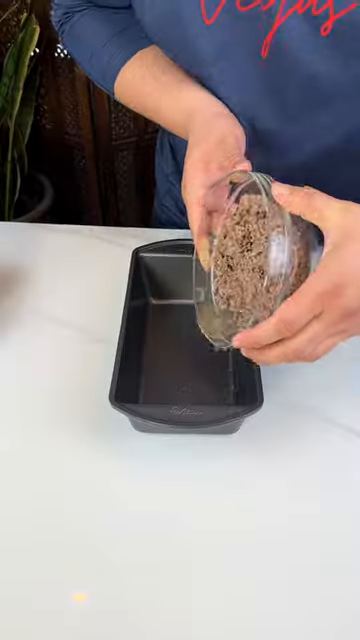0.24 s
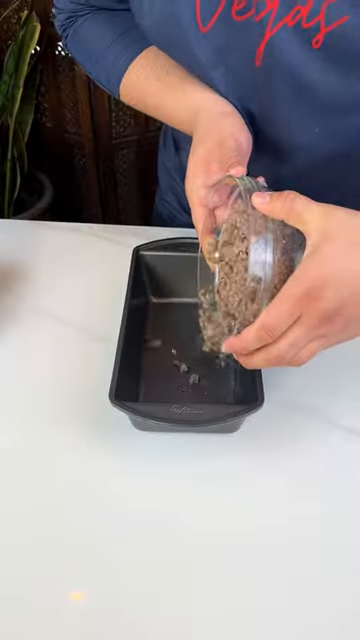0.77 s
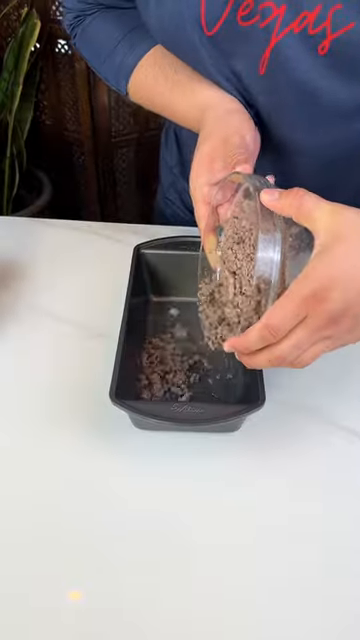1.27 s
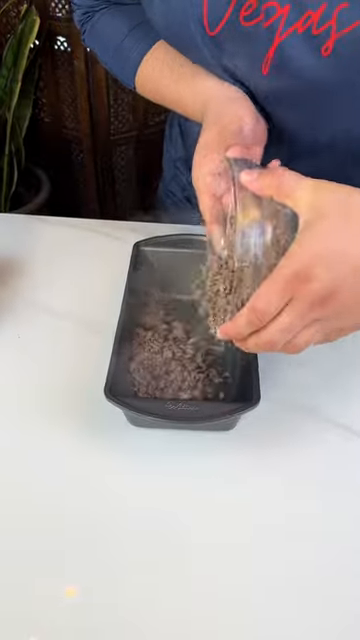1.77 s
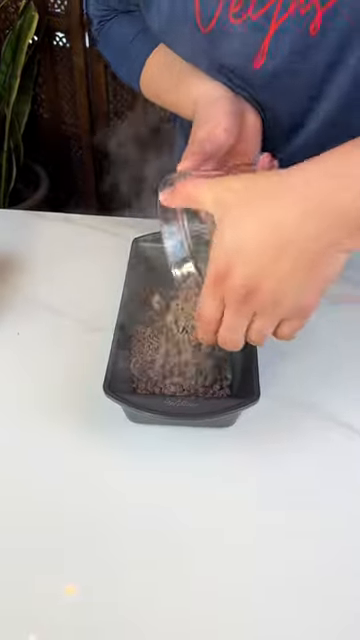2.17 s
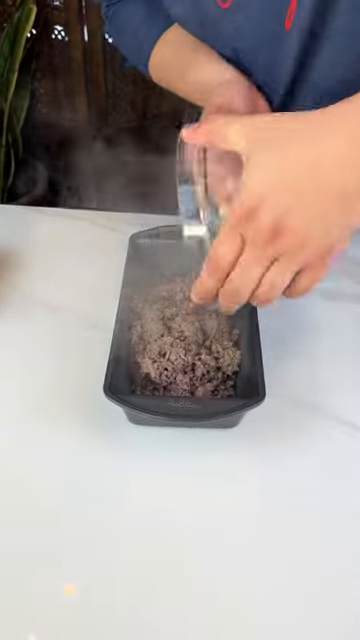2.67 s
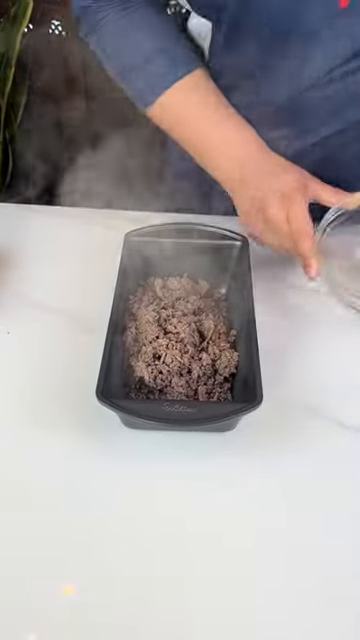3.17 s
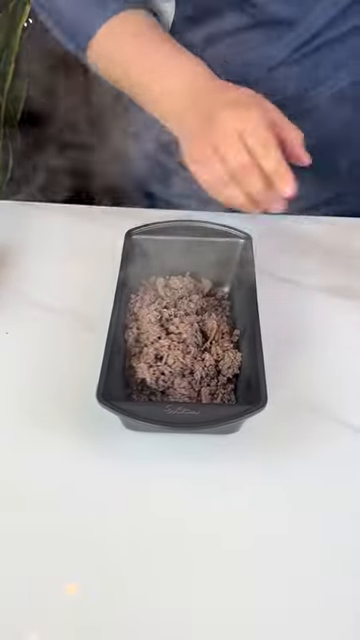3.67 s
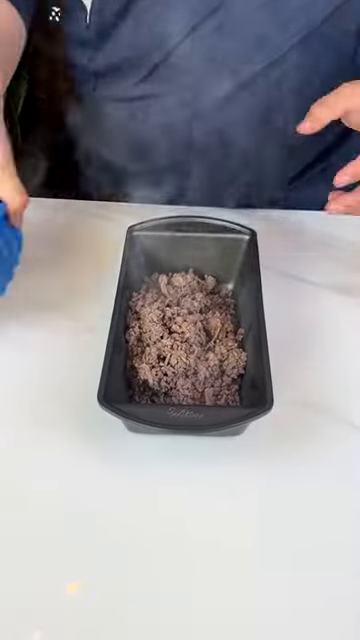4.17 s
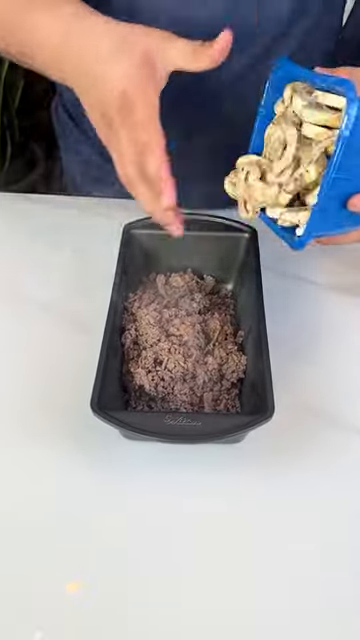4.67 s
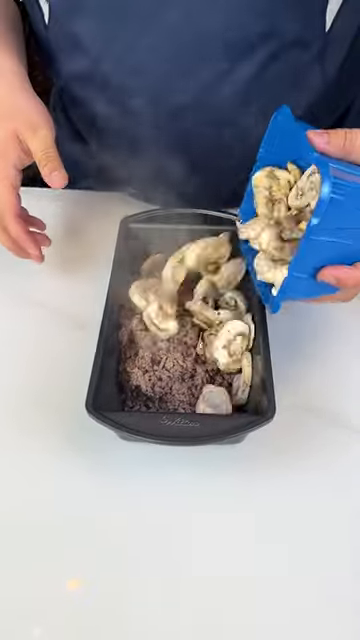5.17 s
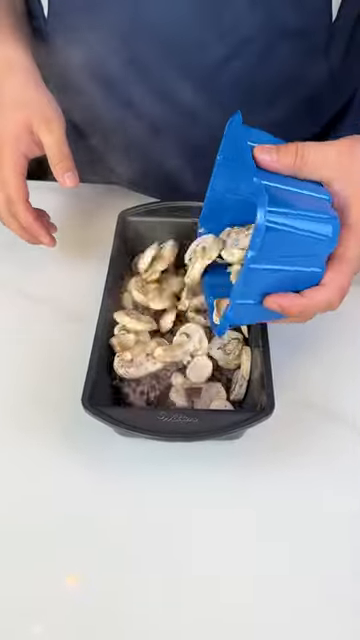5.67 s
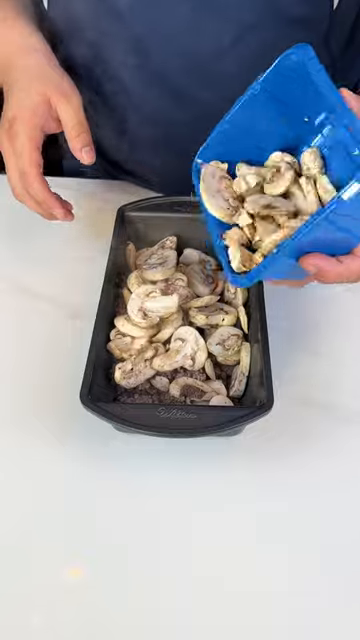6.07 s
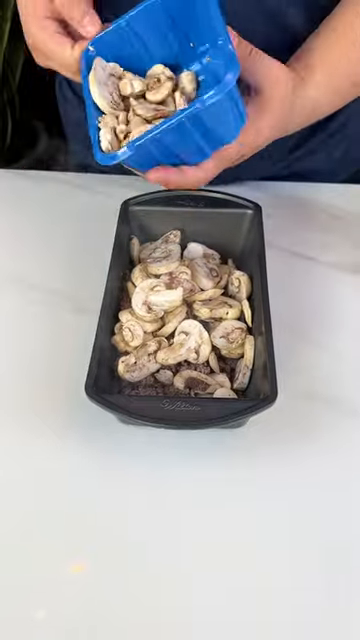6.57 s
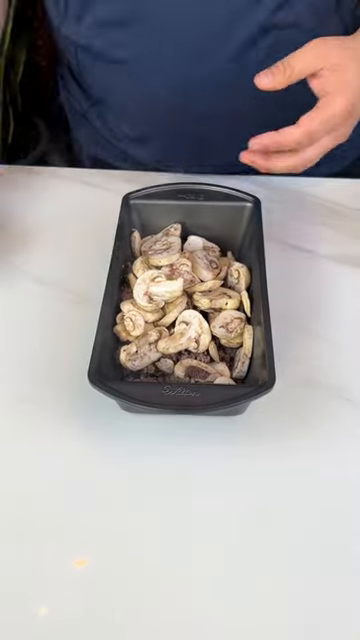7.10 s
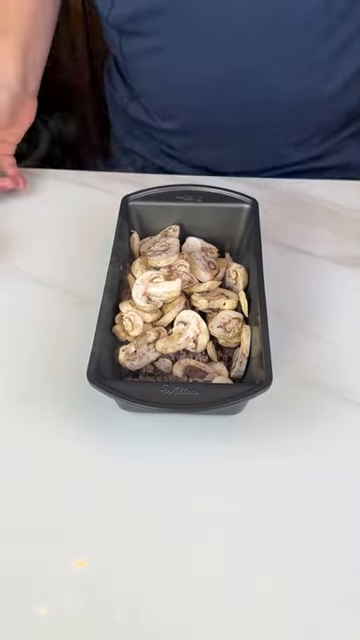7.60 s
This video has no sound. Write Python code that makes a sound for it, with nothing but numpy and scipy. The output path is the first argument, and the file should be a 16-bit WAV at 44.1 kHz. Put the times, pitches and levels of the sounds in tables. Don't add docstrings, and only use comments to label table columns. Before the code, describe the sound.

A loud metallic pan blow with a short bright ring and smaller rebound, then soft crumbly mince thuds. Next come two very hard bowl knocks, edge then flat, light handling scrapes, and a dense patter of wet dull slices against metal. The tub knocks and rattles in the hand before landing with a plasticky clack. Near microphone, short hard-room echo, low ventilation hum throughout.

```python
import sys
import numpy as np
from scipy import signal
from scipy.fft import rfft, irfft, next_fast_len
from scipy.io import wavfile
from scipy.ndimage import uniform_filter1d, minimum_filter1d

SR = 44100
rng = np.random.default_rng(int(sys.argv[2]) if len(sys.argv) > 2 else 0)


def output_pcm(signal):
    pcm = np.clip(np.atleast_2d(signal).T, -1, 1) * 32767
    wavfile.write(sys.argv[1], SR, np.round(pcm).astype(np.int16))


def convert_level_to_amplitude(level_db):
    exponent = np.asarray(level_db, float) / 20
    return 10 ** exponent


N = 345826

# (start [s], end [s])
CUT = (.191, 0.2035)
# (frequency [Hz], density [dB per Hz])
AIR = [(12, -61), (20, -27.5), (86, 1), (244, -20), (273, -23), (314, -17.5), (506, -28.5), (551, -24.5),
       (1950, -31), (5070, -46.5), (6000, -42.5), (10500, -71.5), (15200, -59), (16500, -64)]
# (frequency [Hz], density [dB per Hz])
FIRST_AIR = [(12, -71), (20, -14), (224, -7.5), (351, -17.5), (551, -15), (1080, -18.5), (2240, -23.5),
             (10500, -47), (16500, -46.5)]
# (time [s], pitch [Hz], level [dB])
DRONE = [
    (2.3, 142.2, -80),
    (2.501, 164.1, -45.5),
    (2.799, 178.2, -55.5),
    (3.2, 194, -57),
    (3.502, 192, -74),
]

# (frequency [Hz], t60 [s])
ROOM = [(150, 0.25), (500, 0.24), (1500, 0.21), (4000, 0.21), (9000, 0.2)]
# (frequency [Hz], port difference minus sum [dB])
DIFFUSE_SIDE = [(60, -47.5), (180, -18.5), (310, -9.5), (550, -2), (950, -4.5), (1650, -8.5), (2860, 4),
                (4970, 7), (8640, -29), (15000, 11.5)]
# (frequency [Hz], port difference minus sum [dB])
DIRECT_SIDE = [(60, -43.5), (180, -28), (310, -21), (550, -12.5), (950, -9), (1650, -12.5), (2860, 2.5),
               (4970, -3), (8640, 2.5), (15000, 8.5)]
# (frequency [Hz], gain [dB])
NOTCH = [(9000, 1.5), (9800, -0.5), (10500, -3), (11500, -7.5), (13500, -11), (14600, 3.5), (15400, 0),
         (15900, 1.5), (16200, -34.5)]

# (frequency [Hz], density [dB per Hz])
BODY = [(71, -39.5), (120, 6.5), (178, -1.5), (577, -3.5), (1050, -4), (1560, -20.5), (4000, -31),
        (5200, -33), (8800, -120)]
# (frequency [Hz], density [dB per Hz])
DRAG = [(120, -29.5), (200, -5), (506, 1), (958, 6.5), (1140, 4), (2190, -18), (4000, -17), (5200, -51),
        (8800, -120)]
# (frequency [Hz], density [dB per Hz])
KNOCK = [(900, -45), (1400, 6.5), (1900, 4), (2600, 0.5), (3200, -9), (4200, -44.5)]
# (frequency [Hz], density [dB per Hz])
HISS = [(880, -16.5), (1500, -7), (1940, -3), (3150, -6.5), (4970, -6.5), (6890, -7.5), (9750, -18),
        (12700, -25.5), (16000, -24.5)]
# (frequency [Hz], density [dB per Hz])
FIZZ = [(1060, -14.5), (1800, 1), (2790, -4), (3060, 3.5), (3610, -12), (6180, -7.5), (9950, -22),
        (11200, -40), (15000, -25.5), (16000, -30.5)]

# (time [s], level [dB])
HANDS = [(.24, -59.5), (.72, -56.5), (1.25, -63), (1.55, -58.5), (2.08, -57.5), (2.3, -60), (2.7, -65),
         (3.21, -57.5), (3.85, -68.5), (4.85, -59), (5.05, -55.5), (5.4, -66.5), (5.75, -67), (5.9, -95),
         (6.55, -62.5), (6.72, -70), (6.8, -60), (7.55, -99)]
# (peak time [s], rise [s], fall [s], body [dB], hiss [dB])
SCRAPES = [(3.989, 0.024, 0.11, -54, -60), (4.47, 0.026, 0.086, -55, -61.5),
           (4.583, 0.052, 0.047, -46, -53.5), (5.532, 0.011, 0.017, -45, -64),
           (6.437, 0.01, 0.01, -59, -55.5), (6.609, 0.015, 0.022, -46, -41.5),
           (7.029, 0.11, 0.055, -43, -71), (7.19, 0.024, 0.11, -34.5, -62), (1.15, 0.022, 0.045, -54, -73),
           (2.04, 0.055, 0.084, -60, -61.5), (6.27, .04, .04, -73.5, -66.5), (5.78, .01, .03, -54, -67)]
# (time [s], level [dB])
MINCE_FLOW = [
    (1.52, -38),
    (1.56, -38),
    (1.9, -57.5),
    (2.08, -61),
    (2.33, -59),
    (2.404, -39.5),
    (2.6, -66),
]
# (time [s], level [dB])
SLICE_FLOW = [
    (4.7, -65),
    (4.85, -41),
    (5.0, -36.5),
    (5.28, -41),
    (5.74, -44),
    (5.78, -39),
    (6.12, -58.5),
    (6.249, -41),
]
# (time [s], peak [dB], pitch [Hz])
TICKS = [(0.528, -40.5, 8500), (0.593, -42.5, 5260), (1.6741, -52, 6310), (1.9629, -46, 4010),
         (1.995, -32.5, 3900), (2.039, -43, 4800), (2.0575, -32, 3530), (2.0965, -40, 3920),
         (2.161, -39.5, 7720), (4.807, -37.5, 5680), (5.041, -28, 4150), (5.5048, -35.5, 3730),
         (6.4326, -45, 4130), (7.034, -34, 5600)]
# (time [s], peak [dB], pitch [Hz], t60 [s])
SQUEAKS = [
    (1.834, -42.5, 5700, 0.083),
    (1.837, -46.5, 7460, 0.091),
    (2.6, -62, 2950, 0.11),
    (0.99, -47.5, 5280, 0.053),
    (3.23, -23, 816, 0.051),
    (3.23, -22, 2240, 0.11),
    (3.443, -25.5, 885, 0.14),
]
# (time [s], peak [dB], pitch [Hz], t60 [s])
LIFT = [
    (7.177, -31, 930, .1),
]

# (time [s], peak [dB], pitch [Hz], t60 [s])
PLOPS = [(4.807, -41, 1000, 0.026), (4.82, -45, 1550, 0.054), (4.836, -36.5, 1760, 0.034),
         (4.836, -43, 1100, .04), (4.882, -50, 1180, 0.037), (4.906, -46, 1540, 0.033),
         (4.936, -34, 860, 0.07), (4.936, -42, 2410, 0.022), (4.947, -42, 2430, 0.07),
         (4.951, -33, 1700, 0.055), (4.974, -36, 1050, 0.05), (4.991, -34.5, 1956, 0.041),
         (4.991, -31.5, 1039, 0.13), (5.02, -33.5, 395, 0.089), (5.042, -34, 2230, 0.04),
         (5.052, -29.5, 296, 0.032), (5.065, -24.5, 434, 0.036), (5.135, -45, 1710, 0.05),
         (5.147, -59, 1030, 0.18), (5.172, -41, 633, 0.16), (5.222, -35.5, 1127, .05),
         (5.256, -34.5, 569, 0.095), (5.42, -44, 990, .04), (5.423, -50, 2400, 0.044),
         (5.437, -55, 1100, 0.031), (5.53, -43, 1050, 0.093), (5.661, -40.5, 410, 0.089),
         (5.766, -44, 2520, 0.063), (5.77, -31.5, 582, 0.16), (5.792, -43, 992, .12),
         (5.859, -27.5, 324, 0.038), (5.858, -32, 870, 0.032), (5.908, -42, 1100, 0.037),
         (5.936, -37, 980, 0.074), (6.017, -46, 900, 0.029), (6.076, -52, 1844, 0.059),
         (6.842, -25, 1029, 0.027), (6.884, -46, 1043, 0.089), (6.923, -37, 1030, 0.033),
         (6.953, -36.5, 497, 0.17), (6.974, -36.5, 2270, 0.027), (6.992, -34, 1400, .03),
         (7.021, -32.5, 2140, 0.034), (7.021, -44, 950, 0.053), (7.043, -35, 950, 0.18),
         (7.042, -33, 1290, 0.052), (7.109, -21.5, 330, 0.018), (7.1, -27, 374, 0.073),
         (7.007, -35, 2000, 0.027), (5.643, -39, 1120, 0.026)]
# (time [s], peak [dB], pitch [Hz], t60 [s])
HUMS = [
    (1.545, -45, 1435, 0.18),
    (1.548, -46, 2340, 0.14),
    (1.56, -42, 715, 0.29),
    (1.575, -41, 880, 0.22),
    (1.6, -46.5, 560, 0.42),
    (1.61, -50, 1077, 0.25),
    (1.63, -55, 1700, 0.23),
    (2.391, -48.5, 1042, 0.2),
]
# (time [s],
# peak [dB], pitch [Hz], t60 [s])
CLICKS_AND_NOTES = [(6.846, -27, 398, .06), (6.842, -34, 2500, .02), (10, -42, 7100, .02), (7.032, -37, 3800, 0.014),
                    (8.1, -37.5, 5700, .015), (7.7, -41.5, 1300, 0.016), (7.097, -42, 4200, .012),
                    (7.097, -34, 2600, .02), (10, -43, 2100, 0.022), (5.24, -29, 612, 0.053), (5.041, -34, 1400, .03),
                    (5.5, -45, 2300, .02), (5.186, -42.5, 1700, 0.036), (3.5, -47, 1200, .04), (4.935, -42, 1700, .02),
                    (5.055, -42, 2400, .02), (6.7, -42, 1150, .04), (6.4, -45, 1300, 0.018), (5.858, -49, 1980, .02),
                    (6, -38, 950, .04), (5.812, -36, 1000, .05), (5.332, -38.5, 1200, .03), (5.1, -37, 670, .04),
                    (5.2, -44, 530, .04), (5.67, -41, 820, .04), (5.83, -37, 480, 0.037), (5.075, -33, 250, 0.057),
                    (5.052, -34, 1200, .05), (4.8, -41, 1350, 0.019)]
# (time [s], level [dB], t60 [s])
PINGS = [
    (.742, -33, .55),
    (.866, -43, .5),
    (1.55, -61, .4),
    (4.991, -52, .22),
    (5.128, -55, .2),
    (5.767, -48, .06),
    (5.85, -65, .25),
]

# (time [s], peak [dB], pitch [Hz], knock [dB])
MINCE = [
    (1.372, -38.5, 880, -58),
    (1.542, -49, 600, -40.5),
    (1.599, -51, 666, -41),
    (1.791, -39.5, 880, -48),
    (2.264, -34.5, 590, -69),
    (2.372, -35, 680, -47.5),
]
# (time [s], peak [dB], pitch [Hz], knock [dB])
SLICES = [(4.821, -25, 534, -65), (4.834, -38, 1540, -64), (4.947, -23.5, 830, -34.5),
          (4.991, -35, 1110, -41), (5.044, -21, 1030, -44.5), (5.058, -22.5, 355, -71),
          (5.074, -27.5, 657, -71), (5.24, -34, 600, -60), (5.419, -41, 560, -49), (5.438, -37, 355, -49.5),
          (5.512, -35, 1110, -46.5), (5.642, -42, 724, -61), (5.698, -34, 342, -55),
          (5.767, -26.5, 506, -51), (5.779, -34, 590, -50), (5.857, -34, 624, -59),
          (5.906, -37, 906, -80.5), (5.961, -26, 870, -68), (6.015, -31.5, 290, -65),
          (6.074, -30.5, 1160, -48), (6.338, -38.5, 1030, -78)]
# (time [s], peak [dB], pitch [Hz], knock [dB])
TUB_KNOCKS = [
    (3.976, -58, 727, -49.5),
    (4.461, -48, 1050, -45.5),
    (4.535, -35.5, 1180, -48),
    (4.565, -41, 980, -37),
    (6.841, -22.5, 724, -38),
    (6.925, -29.5, 460, -60),
    (7.034, -31, 925, -55),
    (7.096, -25, 336, -37),
    (7.169, -52, 900, -39),
]
# (time [s], peak [dB], pitch [Hz], knock [dB])
RATTLE = [
    (6.975, -40.5, 687, -45),
    (6.994, -34, 800, -48),
    (7.006, -23, 906, -52.5),
    (7.024, -27, 550, -39),
]
# (tick of a middling knock [dB], first pan ring [dB], ring lost as the pan fills [dB per s], attack [s])
MATERIALS = [
    (-47.5, -7, 10, 0.0048),
    (-53.5, -13.5, 20.5, 0.00053),
    (-41, -27.5, 4, 0.0029),
    (-53.5, -29, -2, 0.003),
]
# (frequency [Hz], level [dB], t60 [s])
PAN = [(560, -1.5, 0.47), (900, 13.5, 0.045), (1082, 3, 0.16), (2240, -32.5, 0.17), (2350, -27, 0.11),
       (1700, -20, 0.1)]

# (time [s], peak [dB])
PAN_BLOW = [
    (0.7355, -27),
    (0.7381, -4),
    (.741, 1.5),
    (.746, -0.5),
    (.752, 0.5),
    (0.765, -16),
    (0.769, -12.5),
]
# (time [s], peak [dB])
PAN_REBOUND = [
    (0.8634, -16.5),
    (0.8649, -4),
    (0.87, -14.5),
    (.882, -30),
]
# (time [s], peak [dB])
BOWL_EDGE = [
    (3.234, -27),
    (3.2399, 4.5),
    (3.243, 1.5),
    (3.251, -5),
    (3.261, -14),
    (3.274, -13.5),
]
# (time [s], peak [dB])
BOWL_FLAT = [
    (3.454, -0.5),
    (3.457, 7.5),
    (3.462, 0),
    (3.471, -6),
    (3.48, -8),
]
# (time [s], peak [dB])
TUB_DOWN = [
    (7.2065, -6.5),
    (7.211, -5.5),
    (7.218, -7.5),
    (7.228, -23.5),
    (7.243, -12.5),
]
# (frequency [Hz], density [dB per Hz])
COLOURS = [
    [(71, -56.5), (130, -9), (300, -14.5), (445, -8.5), (727, -4.5), (1250, -10), (2480, -10),
     (9590, -32.5), (12000, -102), (16000, -66.5)],
    [(120, -58), (200, -26.5), (360, -1), (509, -18), (600, -17), (1500, -18.5), (2560, -16), (9230, -38.5),
     (11500, -62), (16000, -47)],
    [(80, -69), (190, -10), (450, -8.5), (850, -0.5), (1300, 1), (2400, -7), (3000, -14.5), (4300, -20.5),
     (9500, -38), (12500, -56), (14500, -66), (16000, -76)],
    [(100, -38.5), (200, -36.5), (400, -12), (800, -6), (1400, -10.5), (2100, -6.5), (2900, -18),
     (4200, -24.5), (9700, -37.5), (11000, -68), (14500, -50), (16000, -65)],
    [(220, -39), (320, -20), (700, -6), (2300, -4.5), (3600, -17), (9400, -38.5), (10200, -74.5),
     (16000, -79.5)],
]
# (frequency [Hz], level [dB], free t60 [s])
RINGS = [
    [(369, -11.5, 0.14), (1250, -13, 0.15), (1989, -9, 0.04), (3180, -10, .05), (3820, -24, 0.041),
     (647, -4, .07), (727, -6.5, 0.23), (1080, -16.5, 0.25), (1795, -3, .05), (2530, 0.5, 0.097),
     (2700, -4, 0.043), (5260, -12.5, 0.045), (2390, -11.5, .07), (835, -9.5, 0.089)],
    [(359.6, -3, 0.12), (560, -5, 0.17), (844, -4, 0.11), (1150, -6.5, 0.13), (2090, -14.5, 0.17),
     (2340, -5.5, 0.081), (2528, 0, 0.1), (3180, -14, .07), (4090, -20, .1), (5280, -10, .03),
     (4840, -27, 0.081), (6300, -31.5, 0.52)],
    [(355, -11.5, 0.089), (540, -18, 0.071), (838, 0, 0.065), (893, 0, 0.049), (1110, -10.5, 0.084),
     (1290, -11, 0.24), (1400, -4, 0.073), (1570, -10, 0.0577), (1780, -1.5, 0.071), (2234, -7, 0.058),
     (2400, -1.5, 0.11), (2920, -15.5, .08), (4130, -24.5, .07), (723.5, -5.5, .1)],
    [(465, -11.5, 0.098), (727, -6, 0.14), (950, -14, 0.12), (1049.5, -6.5, 0.18), (1288, -7.5, 0.24),
     (1730, -10, .06), (1811, 4.5, 0.067), (2064, -7, 0.084), (2350, -9, 0.11), (2660, -20, 0.13),
     (3670, -24, 0.083), (4150, -8, .03), (4950, -15.5, 0.081), (5910, -15.5, 0.0705)],
    [(318.7, -13.5, .3), (651, -9, .2), (774, -14.5, 0.13), (936, -8.5, 0.21), (1113, -9.5, 0.17),
     (1275, -7.5, 0.15), (1540, -18, 0.12), (1742, 4.5, 0.043), (2140, -12, 0.053), (2340, 0.5, 0.051),
     (2630, -9, 0.13), (3080, -15, 0.13), (3490, -20.5, 0.11), (4250, -16.5, .06)],
]
# (ring [dB], share of free ring time [ratio], contact t60 [s], room [dB])
BLOW_MIX = [
    (-17, 0.83, 0.019, -6.5),
    (-18, 0.82, 0.027, -2),
    (-20.5, 0.76, 0.028, -3.5),
    (-22, 0.92, 0.026, -7.5),
    (-13.5, 0.91, 0.048, -5.5),
]


def evened(x):
    return x / np.sqrt(np.mean(x ** 2) + 1e-20)


def read(points, hz):
    f, value = np.transpose(points)
    return np.interp(np.log(hz + 1), np.log(f + 1), value)


def add(mix, s, sound):
    part = mix[..., round(s * SR):][..., :sound.shape[-1]]
    part += sound[..., :part.shape[-1]]


def coloured(x, spectrum):
    gain_db = np.maximum(read(spectrum, abs(np.fft.fftfreq(8192, 1 / SR))), -100)
    log_gain = np.log(convert_level_to_amplitude(gain_db))
    impulse = np.fft.ifft(np.exp(np.conj(signal.hilbert(log_gain)))).real[:4096]
    if x.ndim > 1:
        impulse = impulse[None]
    return signal.oaconvolve(x, impulse, axes=-1)[..., :x.shape[-1]]


def ring(modes, t):
    return sum(convert_level_to_amplitude(db - 60 * t / t60) * np.sin(2 * np.pi * hz * t) for hz, db, t60 in modes)


def ports(common, differing, side_table, turn=0):
    size = next_fast_len(len(common))
    side_gain = convert_level_to_amplitude(read(side_table, np.fft.rfftfreq(size, 1 / SR)))
    side = np.exp(1j * turn) * rfft(differing, size) * side_gain
    side = irfft(side, size)[:len(common)]
    return np.array([common + side, common - side])


def in_room(x, room_db):
    echoes = np.zeros((2, SR // 2 + 4000))
    first, spacing = 400, 20
    at = np.arange(first, SR // 2, spacing) + rng.integers(0, spacing, (2, (SR // 2 - 381) // spacing))
    np.put_along_axis(echoes, at, rng.choice([-1., 1.], at.shape), 1)
    hz, t, z = signal.stft(echoes, SR, nperseg=256)
    fall_db = 60 * t / read(ROOM, hz)[:, None]
    decay = convert_level_to_amplitude(-fall_db) + convert_level_to_amplitude(-16.5 - 0.37 * fall_db)
    tails = signal.istft(z * decay, SR, nperseg=256)[1]
    tails = tails / np.linalg.norm(tails[0])
    echo = convert_level_to_amplitude(room_db) * signal.oaconvolve(x[None], tails, axes=1)[:, :len(x)]
    placed = ports(x + echo[0], x + 0.83 * echo[0], DIRECT_SIDE, 1.65)
    return placed + ports(0 * x, 0.95 * echo[1], DIRECT_SIDE)


def air(colour, db, patchy_db):
    hz, t, z = signal.stft(rng.standard_normal((2, N)), SR, nperseg=1024, noverlap=768)
    patches = uniform_filter1d(rng.standard_normal(z.shape[1:]), 14, 0)
    patches = evened(uniform_filter1d(patches, 12, 1))
    noise = signal.istft(z * convert_level_to_amplitude(patchy_db * patches), SR, nperseg=1024, noverlap=768)[1][:, :N]
    return convert_level_to_amplitude(db) * evened(ports(*coloured(noise, colour), DIFFUSE_SIDE))


def drone():
    t = np.arange(N) / SR
    s, hz, db = np.transpose(DRONE)
    waver = evened(uniform_filter1d(rng.standard_normal((2, N)), 2500))
    turns = np.cumsum(np.interp(t, s, hz) + 4 * waver[0]) / SR
    level_db = np.interp(t, s, db, -120, -120) + 1.3 * waver[1]
    return convert_level_to_amplitude(level_db) * np.sin(2 * np.pi * turns)


def grains(colour, per_s, spread_db, t60):
    size = convert_level_to_amplitude(spread_db * np.minimum(rng.exponential(1, N), 3.2))
    size = size * (rng.random(N) < per_s / SR)
    bursts = signal.lfilter([1], [1, -convert_level_to_amplitude(-60 / (t60 * SR))], size)
    return evened(coloured(bursts * rng.standard_normal(N), colour))


def rustle():
    t = np.arange(N) / SR
    hands = convert_level_to_amplitude(np.interp(t, *np.transpose(HANDS)))
    flow = sum(convert_level_to_amplitude(np.interp(t, *np.transpose(pour), -120, -120)) for pour in (MINCE_FLOW, SLICE_FLOW))
    hands_body = convert_level_to_amplitude(5.5) * hands
    lumps = convert_level_to_amplitude(-7.5) * np.hypot(flow, hands_body) * grains(BODY, 260, 4.2, 0.11)
    crackle = convert_level_to_amplitude(-4.5) * hands * grains(FIZZ, 830, 5.2, 0.04)
    low, high = np.zeros(N), np.zeros(N)
    for peak, rise, fall, body_db, hiss_db in SCRAPES:
        swell = np.exp(-2 * ((t - peak) / np.where(t < peak, rise, fall)) ** 2)
        low += convert_level_to_amplitude(body_db) * swell
        high += convert_level_to_amplitude(hiss_db) * swell
    drags = low * grains(DRAG, 830, 1.6, 0.02) + high * grains(HISS, 880, 1.3, 0.058)
    return lumps + crackle + drags


def ticks():
    t, out = np.arange(18000) / SR, np.zeros(N)
    rows = [(*row, .025) for row in TICKS] + SQUEAKS + LIFT
    snaps = evened(uniform_filter1d(rng.standard_normal((len(rows), len(t) // 2)), 40))
    snaps = np.tile(snaps, 2)
    for (s, db, hz, t60), snap in zip(rows, snaps):
        envelope = convert_level_to_amplitude(db - 5.0 - 60 * t / t60) * np.minimum(t / 0.0025, 1)
        roughness = 0.28 + snap * convert_level_to_amplitude(-60 * t / 0.18)
        add(out, s, envelope * roughness * np.sin(2 * np.pi * hz * t))
    return out


def pings():
    t, swing = np.arange(SR // 2) / SR, np.zeros(N)
    for s, db, t60 in PINGS:
        add(swing, s, np.minimum(t / 0.0016, 1) * convert_level_to_amplitude(db - 60 * t / t60))
    return swing * np.sin(2 * np.pi * 2946 * np.arange(N) / SR)


def plops():
    t, out = np.arange(9000) / SR, np.zeros(N)
    for s, db, hz, t60 in PLOPS + HUMS + CLICKS_AND_NOTES:
        modes = [(hz, db - 1.0, t60), (hz * 1.045, db - 11.5, 0.66 * t60), (hz * 1.4, db - 17, 1.33 * t60)]
        add(out, s, np.minimum(t / 0.00097, 1) * ring(modes, t))
    return out


def taps():
    t, out, kicks = np.arange(5000) / SR, np.zeros(N), np.zeros(N)
    middling_knock_db, tick_follows = -36.5, 0.8
    for pieces, material in zip((MINCE, SLICES, TUB_KNOCKS, RATTLE), MATERIALS):
        tick_base_db, pan_db, filling_db, attack = material
        shape = (len(pieces), len(t))
        thuds = evened(coloured(rng.standard_normal(shape), BODY))
        knocks = evened(coloured(rng.standard_normal(shape), KNOCK))
        snaps = evened(coloured(rng.standard_normal(shape), HISS))
        for (s, db, hz, knock_db), thud, knock, snap in zip(pieces, thuds, knocks, snaps):
            t60 = 30 / (hz + 400)
            tick_db = tick_base_db + tick_follows * (knock_db - middling_knock_db)
            body = ring([(hz, -3, t60)], t) + convert_level_to_amplitude(-6.0 - 60 * t / 0.045) * thud
            bright = convert_level_to_amplitude(knock_db - 60 * t / 0.053) * knock + convert_level_to_amplitude(tick_db - 60 * t / 0.037) * snap
            add(out, s, np.minimum(t / attack, 1) * (convert_level_to_amplitude(db) * body + bright))
            kicks[round(s * SR)] = convert_level_to_amplitude(db + pan_db - filling_db * (s - pieces[0][0]))
    pan_ring = ring(PAN, np.arange(SR // 2) / SR)
    return out + convert_level_to_amplitude(-13.5) * signal.oaconvolve(kicks, pan_ring)[:N]


def blow(contacts, colour, modes, ring_db, freedom, t60, room_db):
    chatter_db, wobble_rad = 4, 0.65
    split, twin_db = 1.023, -13.5
    t, start = np.arange(SR) / SR, contacts[0][0]
    crack, kicks = np.zeros(SR), np.zeros(SR)
    noise = evened(coloured(rng.standard_normal(SR), colour))
    for s, db in contacts:
        add(crack, s - start, convert_level_to_amplitude(db - 8.5 - 60 * t / t60) * np.minimum(t / 0.0012, 1))
        kicks[round((s - start) * SR)] = convert_level_to_amplitude(2 * db)
    chatter = uniform_filter1d(uniform_filter1d(abs(noise), size=200), size=200)
    chatter = chatter_db * np.clip(evened(chatter - chatter.mean()), -2, 1.6)
    sound = crack * noise
    for k, (hz, db, free_s) in enumerate(modes):
        energy = signal.lfilter([1], [1, -convert_level_to_amplitude(-120 / (free_s * freedom * SR))], kicks)
        swing = np.sqrt(abs(uniform_filter1d(energy, size=31, origin=15)))
        wobble = wobble_rad / chatter_db * np.roll(chatter, -2500 * k - 1200)
        turn = 2 * np.pi * hz * t + wobble
        pair = np.sin(turn) + convert_level_to_amplitude(twin_db) * np.sin(split * turn)
        flicker = convert_level_to_amplitude(ring_db + db + np.roll(chatter, -2500 * k))
        sound = sound + flicker * swing * pair
    sound = signal.lfilter(*signal.butter(2, 100, "high", fs=SR), sound)
    return start, in_room(sound, room_db)


def scene():
    first = air(FIRST_AIR, -54.5, 0.46)
    main = air(AIR, -47, 0.14) + drone()
    blows = [PAN_BLOW, PAN_REBOUND, BOWL_EDGE, BOWL_FLAT, TUB_DOWN]
    for contacts, colour, modes, mix in zip(blows, COLOURS, RINGS, BLOW_MIX):
        add(main, *blow(contacts, colour, modes, *mix))
    main += in_room(rustle() + ticks() + taps() + pings() + plops(), -7.0)
    t = np.arange(N) / SR
    fade_out = np.clip((CUT[0] - t) / .003, 0, 1)
    fade_in = np.clip((t - CUT[1]) / 0.011, 0, 1)
    return first * fade_out + main * fade_in


def band_limit(x):
    return signal.sosfilt(signal.butter(12, 16950, fs=SR, output="sos"), x)


def record(dry):
    size = next_fast_len(N)
    mid = dry.mean(0)
    notch_gain = convert_level_to_amplitude(read(NOTCH, np.fft.rfftfreq(size, 1 / SR)))
    notched = irfft(rfft(mid, size) * notch_gain, size)[:N]
    sound = dry + notched - mid
    headroom = np.minimum(1, .97 / (abs(sound).max(0) + 1e-9))
    headroom = minimum_filter1d(headroom, size=89)
    return band_limit(sound * uniform_filter1d(headroom, size=45))


dry = scene()
out = record(dry)
output_pcm(out)
```